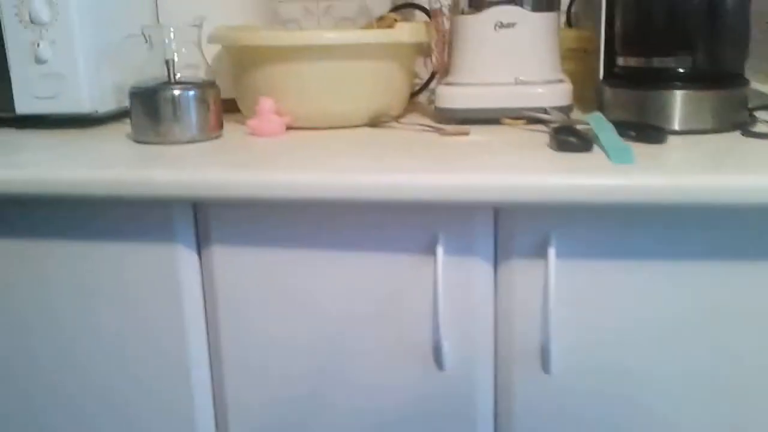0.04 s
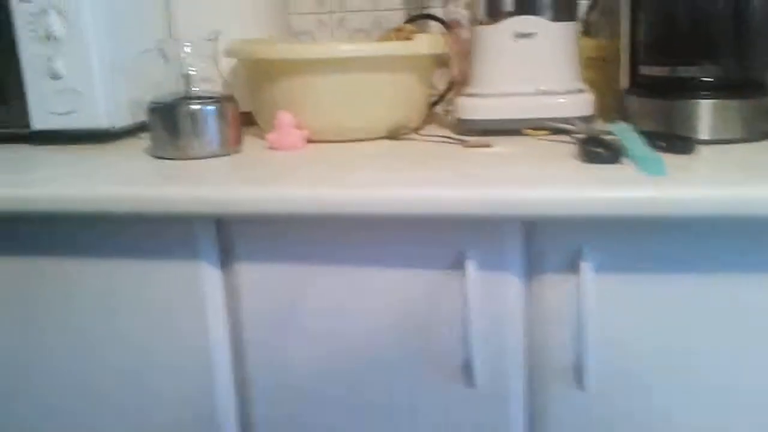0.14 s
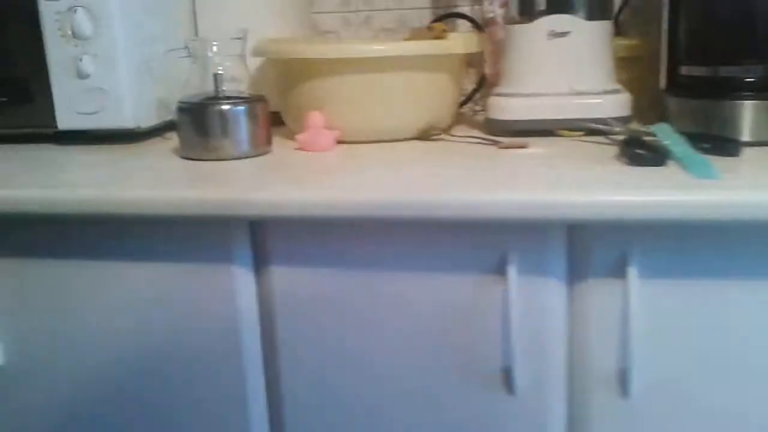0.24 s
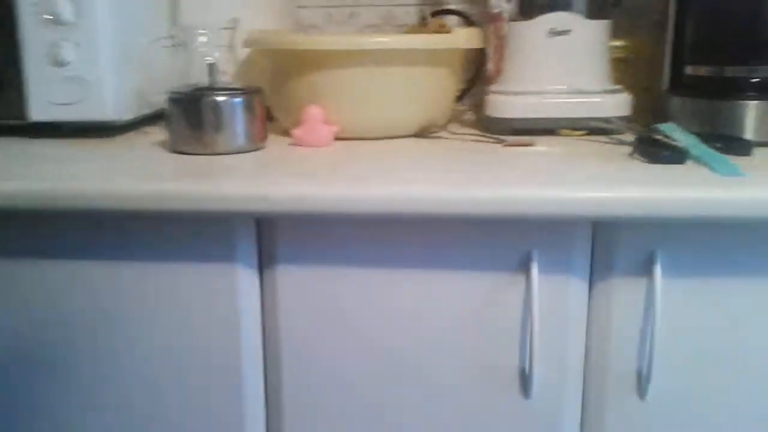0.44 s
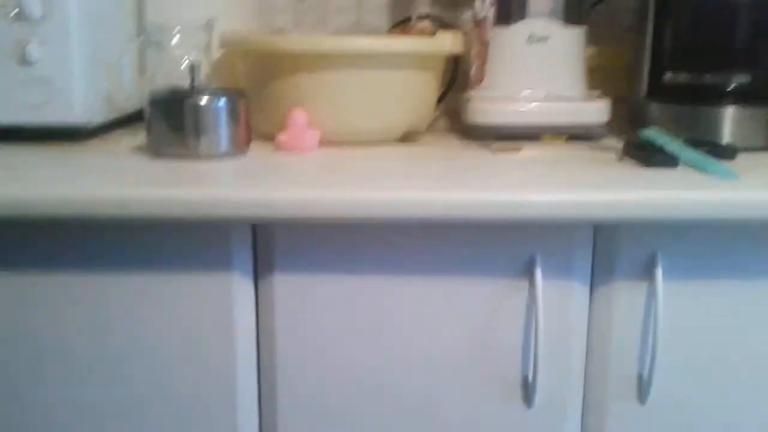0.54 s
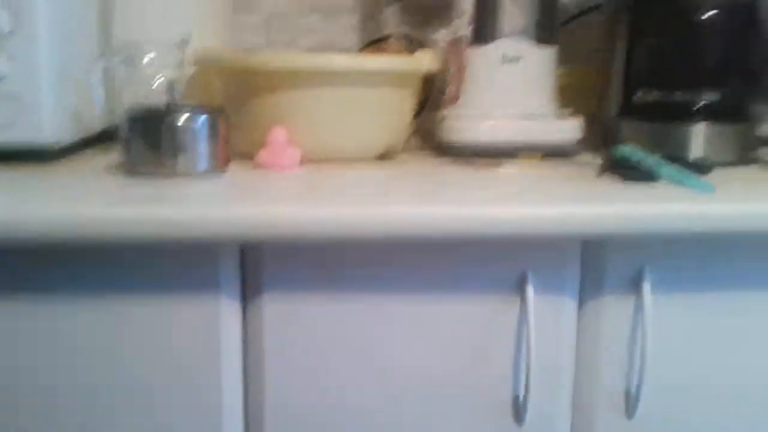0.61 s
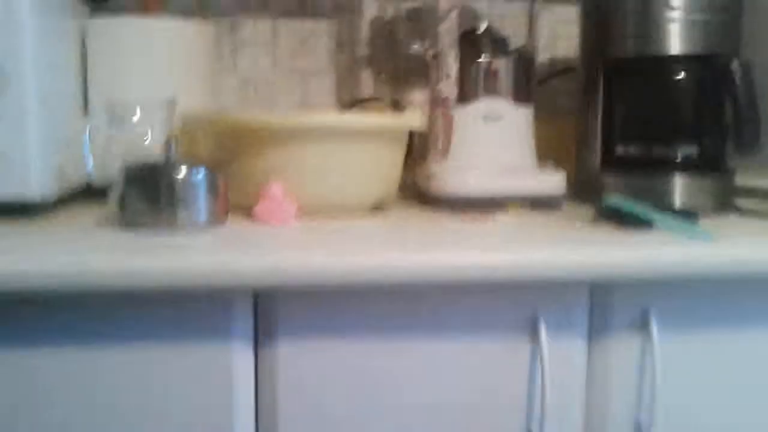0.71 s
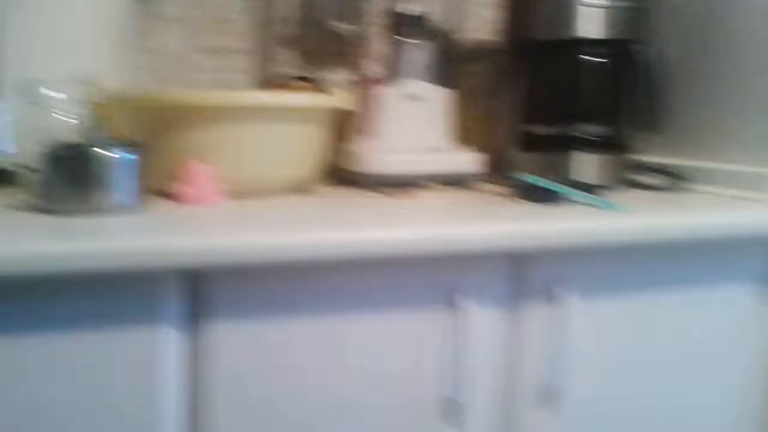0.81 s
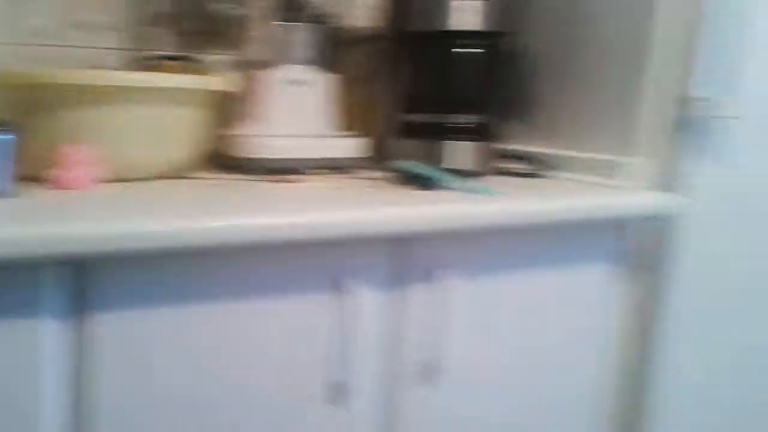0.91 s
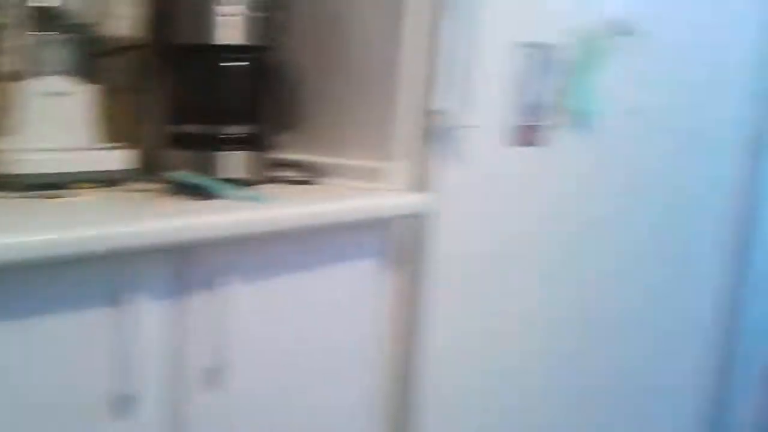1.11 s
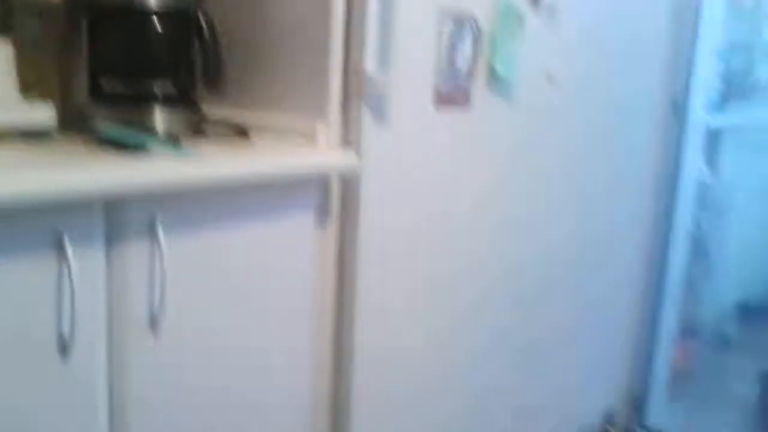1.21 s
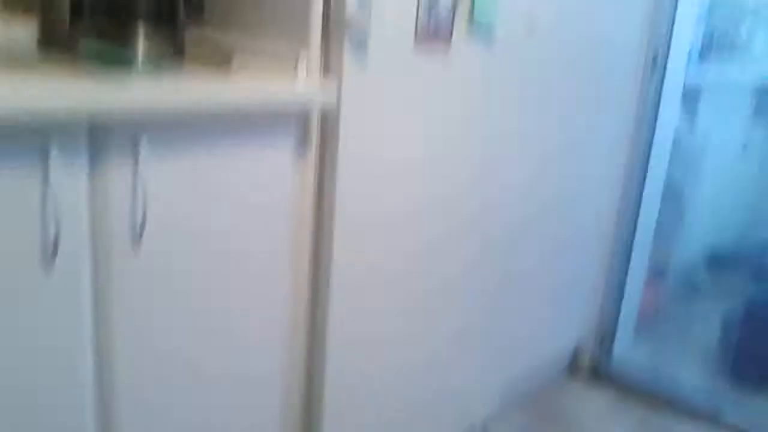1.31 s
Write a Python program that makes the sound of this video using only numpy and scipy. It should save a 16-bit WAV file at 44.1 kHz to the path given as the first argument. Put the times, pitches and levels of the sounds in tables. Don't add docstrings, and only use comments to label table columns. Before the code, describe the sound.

A heavy hollow door bangs with two blows almost run together, after small latch ticks and scuffs; loose things settle, then cloth brushes softly. Quiet small kitchen, close single microphone, faint refrigerator hum and hiss.

```python
import sys
import numpy as np
from scipy import signal
from scipy.io import wavfile

SR = 44100
rng = np.random.default_rng(int(sys.argv[2]) if len(sys.argv) > 2 else 0)


def file_out(sig):
    cols = np.atleast_2d(sig).T
    lim = np.clip(cols, -1, 1)
    pcm = np.round(lim * 32767).astype(np.int16)
    wavfile.write(sys.argv[1], SR, pcm)


def field_ratio(decibels):
    return 10 ** (np.asarray(decibels, dtype=float) / 20)


N = 59535
T = np.arange(N) / SR

# t/s, peak level/dB, ring held until t/s, t60/s once damped, lag/s of the beat's null
BLOWS = [
    (0.2075, -8.5, 0.277, 0.03, -0.004),
    (0.2965, -9.5, 0.347, 0.03, 0.005),
]
# f/Hz, level/dB at first blow, level/dB at second blow, t60/s
DOOR_MODES = [(128.2, -16, -26, 0.43), (158.4, -20, -37, 1.2), (220.7, -19, -19.5, 1.5), (262.9, -8, -12, 0.72),
              (292.7, 4.5, -13, 0.92), (329.2, 0.5, -36, 0.65), (293, -36, 1.5, 0.29), (335.8, -7, 3, 0.44),
              (435.4, -12.5, -10, 0.9), (497.3, -19, -12, 1), (618.4, -12, -21, 1.2), (877, -10.5, -33, 0.49),
              (1082, -19.5, -18.5, 0.6), (1316, -17, -10.5, 0.58),
              (679, -12, -31, 0.16), (738.4, -12, -8.5, 0.35), (1216, -16.5, -17, 0.42),
            (1517, -11, -10.5, 0.18), (2022, -19.5, -23, .25), (2033, -44, -19.5, 0.37),
            (2173, -19.5, -43, .25), (3038, -35, -35, .2), (4030, -23.5, -21, 0.24)]
FREE_SHARE_DB = (-16, -28)
# f/Hz, density level/dB
FIRST_COLOUR = [(30, -51), (140, -17.5), (300, 5.5), (600, -4), (1300, -11.5), (5000, -26), (12500, -42),
                (15000, -45)]
SECOND_COLOUR = [(30, -25), (140, -14), (300, 6), (700, -2.5), (1900, -8.5), (2700, -23.5), (4100, -23),
                 (10500, -48)]
# f/Hz, t60/s
CLATTER_T60 = [(60, 0.64), (200, 0.49), (600, 0.36), (1500, 0.41), (4000, 0.34), (8000, 0.29),
               (13000, 0.063)]
CRACK_TILT = (.5, -.1)
# t/s, peak level/dB, centre f/Hz, width/Hz
SNAPS = [(.0872, -30, 1800, 2500), (.0906, -28, 1800, 1500), (.0995, -34, 2800, 3000),
         (.1185, -27, 1500, 2500), (.1445, -32, 450, 500), (.1525, -29, 400, 500), (.1685, -29, 1500, 3000),
         (.1910, -22, 5000, 1500), (.1945, -24, 950, 600), (.1995, -24, 800, 600), (.4340, -31, 5100, 1400),
         (.6650, -32, 1300, 2000), (.6657, -34, 500, 500), (.6677, -33, 550, 700), (.6808, -33, 500, 700),
         (.6882, -36, 2700, 1500), (.6945, -35, 600, 800), (.6982, -35, 600, 800), (.7130, -37, 1500, 2500)]
# t/s, rms level/dB, centre f/Hz, width/Hz, t60/s
SCUFFS = [(0.089, -43, 2200, 2700, 0.51), (0.11, -47, 3000, 4650, 0.067), (0.15, -41.5, 450, 500, 0.98),
          (0.16, -39, 1000, 1200, 0.3), (.1680, -64, 2500, 5000, 0.19), (0.17, -53, 5000, 6000, 0.05),
          (.1940, -28.5, 900, 900, 0.58), (.1955, -41, 4500, 7400, 0.19), (0.47, -47.5, 4500, 8000, .3),
          (0.41, -33, 218, 40, 0.36), (0.44, -35, 640, 30, 0.19), (0.085, -43.5, 860, 1160, 0.43),
          (0.57, -52.5, 900, 2000, 0.35), (0.72, -57.5, 3000, 5000, 0.9), (.6700, -47, 286, 280, 0.73),
          (.5600, -47.5, 210, 140, 0.46), (0.62, -58.5, 987, 18, 1.94), (.0010, -55, 1158, 35, 0.53),
          (0.13, -43.5, 280, 150, 0.66)]
# f/Hz, density level/dB
BRUSH_COLOUR = [(300, -29), (600, 1), (1250, -4), (3600, 1), (8000, -5), (14500, -11)]
# t/s, level/dB
STIR = [(0, -53.5), (.2, -48), (.45, -45), (.56, -50.5), (.64, -47.5), (.7, -47.5), (.8, -49), (.93, -50.5),
        (.98, -52.5), (1.2, -52.5), (1.3, -49), (1.35, -49)]
# f/Hz, density level/dB
HISS_COLOUR = [(30, -41), (110, -14), (430, -9.5), (1000, -17.5), (2000, -19), (5000, -21), (6200, -28),
               (14500, -28)]
# f/Hz, rms level/dB, waver/dB
HUM = [(99.5, -59, 1.5), (199, -67, 2), (293, -68, 2), (442, -61, 2), (508, -64, 2), (540, -67, 2),
       (650, -66, 2), (834, -72, 2), (985, -73, 2), (2800, -74, 2), (2900, -74, 2)]
# frame level/dB, threshold level/dB
STARVE = [(-48, -100), (-43, -83), (-30, -80), (-13, -68)]


def rms_one(x):
    return x / np.sqrt(np.mean(x ** 2) + 1e-20)


def at_hz(points, hz):
    table_hz, values = np.transpose(points)
    return np.interp(np.log(hz), np.log(table_hz), values)


def dying(start, rise, t60):
    t = np.maximum(T - start, 0)
    return (1 - np.exp(-t / max(rise, 1e-4))) * field_ratio(-60 * t / t60)


def drift(rate):
    r = np.exp(-80 * np.pi * rate / SR)
    white = rng.standard_normal(N // 40 + 2002)
    slow = signal.lfilter([1], [1, -2 * r, r * r], white)[2000:]
    return np.interp(np.arange(N) / 40, np.arange(len(slow)), rms_one(slow))


def resonance(x, hz, width):
    r = np.exp(-np.pi * width / SR)
    return signal.lfilter([1, 0, -1], [1, -2 * r * np.cos(2 * np.pi * hz / SR), r * r], x)


def steep(x, hz, width):
    return resonance(resonance(x, hz, width), hz, width)


def bands(colour, shape):
    edges = 28 * 2 ** (np.arange(29) / 3)
    white = rng.standard_normal((2, N + SR // 4))
    out, power = 0, 0
    for k, (low, high) in enumerate(zip(edges, edges[1:])):
        hz = np.sqrt(low * high)
        sos = signal.butter(2, [low, high], "band", fs=SR, output="sos")
        band = field_ratio(at_hz(colour, hz)) * signal.sosfilt(sos, white[k % 2])[-N:]
        out = out + band * shape(hz)
        power += np.mean(band ** 2)
    return out / np.sqrt(power)


def panel():
    free_t60 = 0.77
    out = 0
    for b, (start, db, held_until, damped_t60, lag) in enumerate(BLOWS):
        ring = 0
        for k, (hz, *mode_db, t60) in enumerate(DOOR_MODES):
            tone = np.sin(2 * np.pi * hz * (T - start - lag))
            ring = ring + (-1) ** k * field_ratio(mode_db[b]) * tone * dying(start + max(lag, 0), 0.01, t60)
        after = np.maximum(T - held_until, 0)
        undamped = field_ratio(-60 * after / damped_t60)
        free = field_ratio(FREE_SHARE_DB[b] - 60 * after / free_t60)
        out = out + field_ratio(db) * ring * (undamped + (1 - undamped) * free)
    return out


def clatter():
    level_db, rise_s, hold_s = (-11, -13.5), (0.0029, 0.0016), (0.02, 0.018)
    crack_db, crack_t60 = (-12, -8.5), 0.041
    out = 0
    for b, colour in enumerate((FIRST_COLOUR, SECOND_COLOUR)):
        start = BLOWS[b][0]
        held = np.clip(T - start, 0, hold_s[b])
        crack = field_ratio(crack_db[b]) * dying(start, 0.00013, crack_t60)

        def shape(hz):
            t60 = at_hz(CLATTER_T60, hz)
            tail = dying(start, rise_s[b] + 2.0 / hz, t60) * field_ratio(60 * held / t60)
            grains = field_ratio(level_db[b] + 1.5 * drift(80))
            return grains * tail + crack * (hz / 2000) ** CRACK_TILT[b]

        out = out + bands(colour, shape)
    return out


def ticks():
    out = 0
    for start, db, hz, width in SNAPS:
        click = (np.arange(N) == int(start * SR)) + 1e-18
        snap = steep(click, hz, width)
        out = out + field_ratio(db) * snap / np.abs(snap).max()
    dull = signal.butter(4, 6100, fs=SR, output="sos")
    for start, db, hz, width, t60 in SCUFFS:
        rub = signal.sosfilt(dull, rng.standard_normal(N))
        out = out + field_ratio(db) * rms_one(steep(rub, hz, width)) * dying(start, 0.00046, t60)
    return out


def brush():
    start, rise, hold, t60 = 1.216, 0.025, 0.042, 0.51
    grain = field_ratio(-46 + 1.2 * drift(150)) * np.clip((T - start) / rise, 0, 1)
    after = np.maximum(T - start - hold, 0)
    return grain * bands(BRUSH_COLOUR, lambda hz: field_ratio(-60 * after / t60 * (hz / 3000) ** 0.5))


def refrigerator():
    hum = 0
    for hz, db, waver_db in HUM:
        phase = 2 * np.pi * (hz * T + rng.random()) + drift(4)
        hum = hum + field_ratio(db + 3 + waver_db * drift(3)) * np.sin(phase)
    whirr = field_ratio(-69) * rms_one(resonance(rng.standard_normal(N), 2750, 220))
    return hum + whirr


def room_hiss():
    shared = drift(15)
    patchy = bands(HISS_COLOUR, lambda hz: field_ratio(drift(10) + 0.6 * shared))
    stir = field_ratio(np.interp(T, *np.transpose(STIR)))
    return stir * patchy + field_ratio(-64) * rng.standard_normal(N)


def starve(x):
    hz, _, z = signal.stft(x, SR, nperseg=1024)
    frame_db = 10 * np.log10(np.sum(np.abs(z) ** 2, axis=-2, keepdims=True) + 1e-12)
    threshold = field_ratio(np.interp(frame_db, *np.transpose(STARVE)))
    keep = (np.abs(z) > threshold) | (hz[:, None] < 9300)
    return signal.istft(z * keep, SR, nperseg=1024)[1][..., :N]


def scene():
    mono = panel() + clatter() + ticks() + brush() + refrigerator() + room_hiss()
    return np.tile(mono, (2, 1))


def top_cut(x):
    return signal.sosfilt(signal.butter(12, 15950, fs=SR, output="sos"), x)


def record(dry):
    ceiling = 1.4
    limited = ceiling * np.tanh(dry / ceiling)
    treble_cut = signal.cheby2(20, 60, 14900, fs=SR, output="sos")
    mix = signal.sosfilt(treble_cut, starve(limited))
    return top_cut(mix)


dry = scene()
out = record(dry)
file_out(out)
```